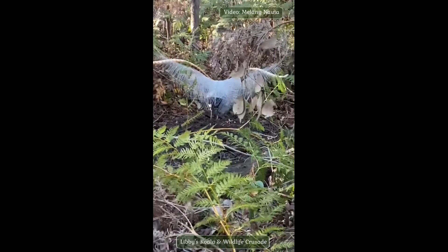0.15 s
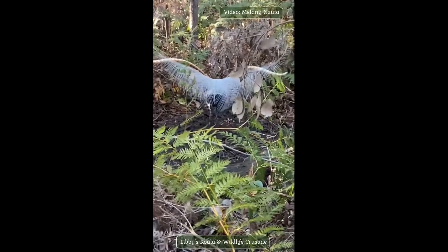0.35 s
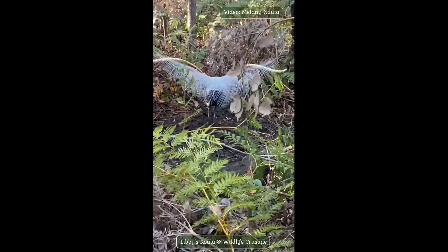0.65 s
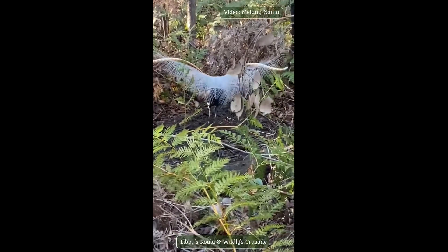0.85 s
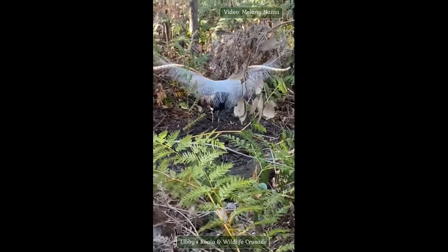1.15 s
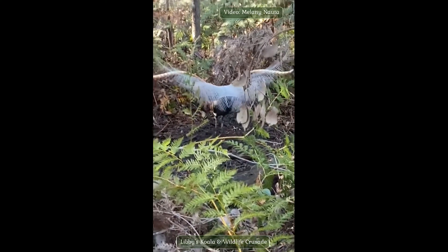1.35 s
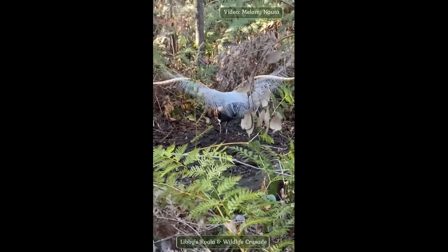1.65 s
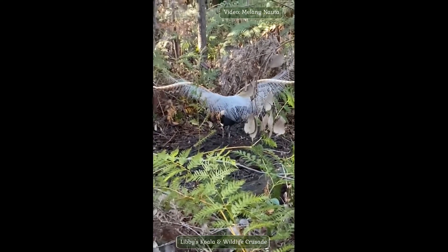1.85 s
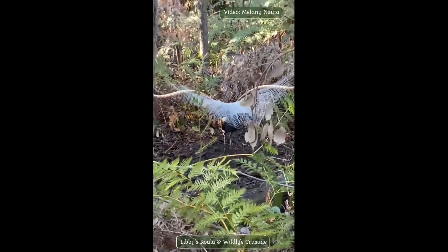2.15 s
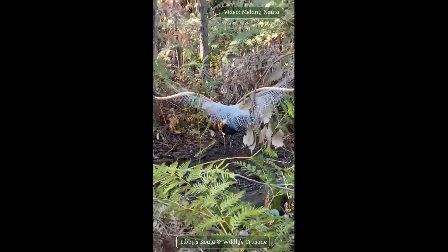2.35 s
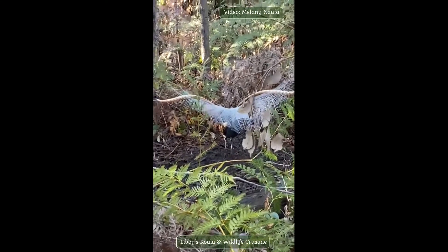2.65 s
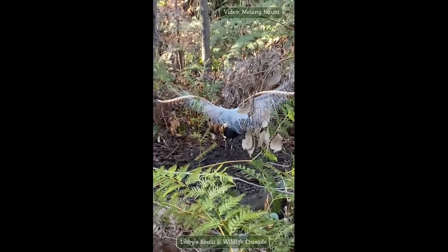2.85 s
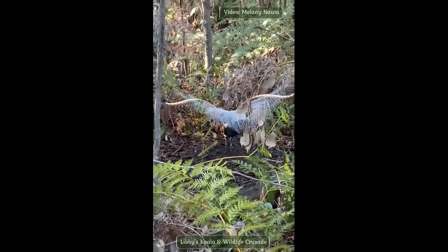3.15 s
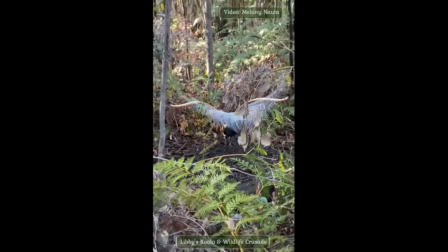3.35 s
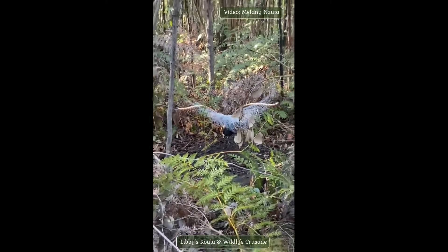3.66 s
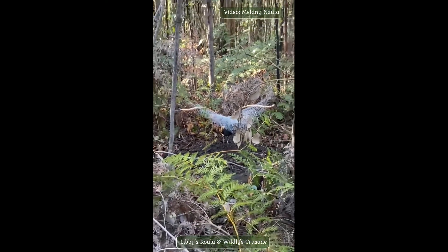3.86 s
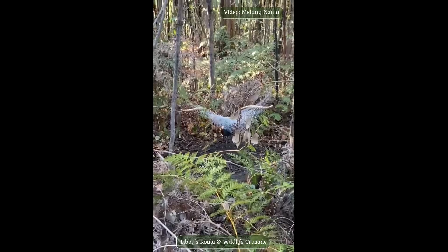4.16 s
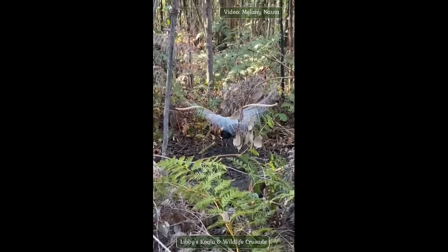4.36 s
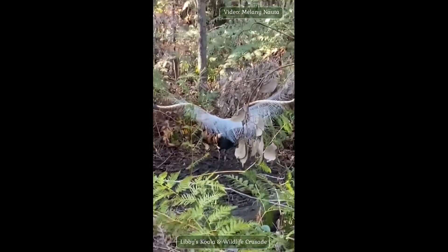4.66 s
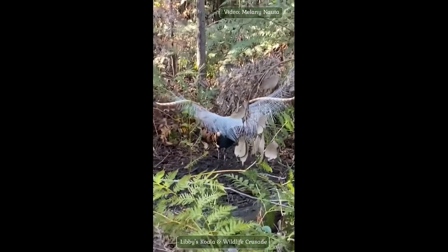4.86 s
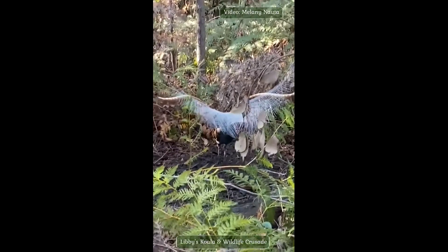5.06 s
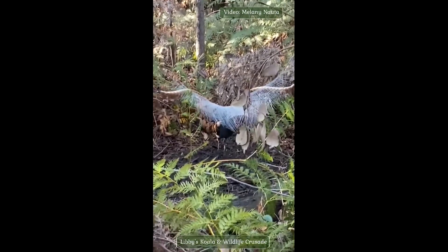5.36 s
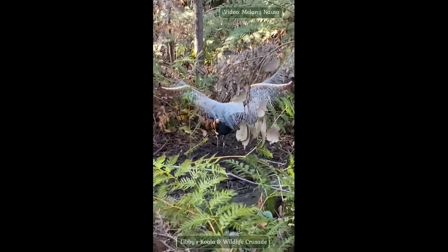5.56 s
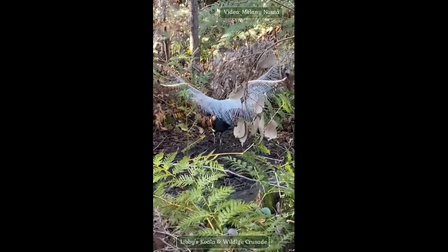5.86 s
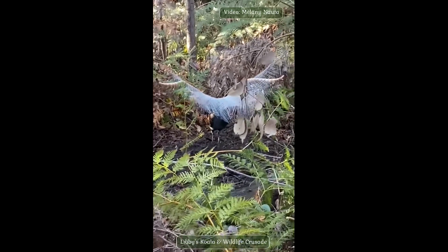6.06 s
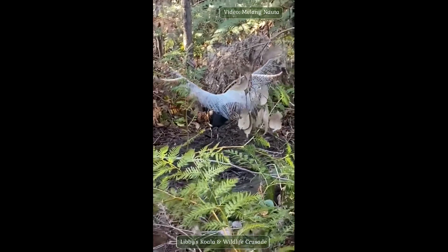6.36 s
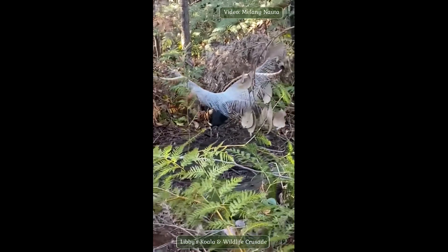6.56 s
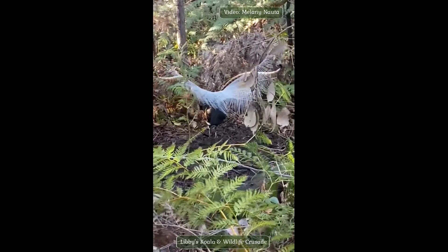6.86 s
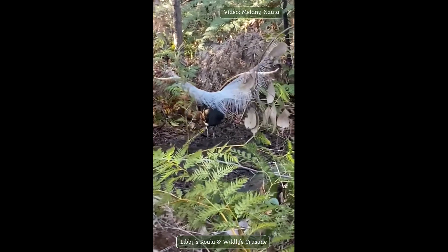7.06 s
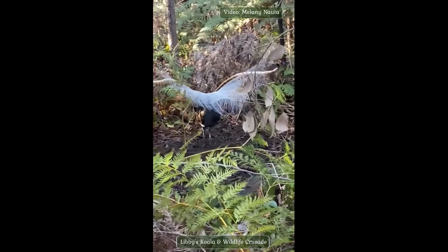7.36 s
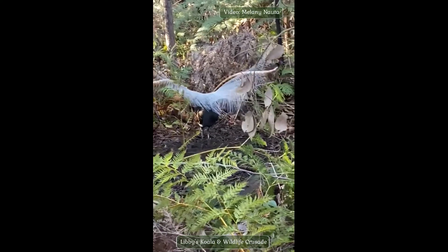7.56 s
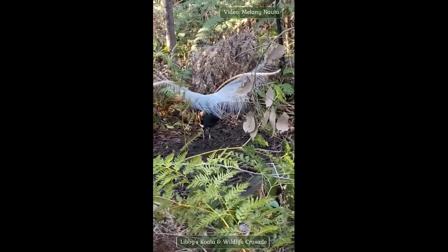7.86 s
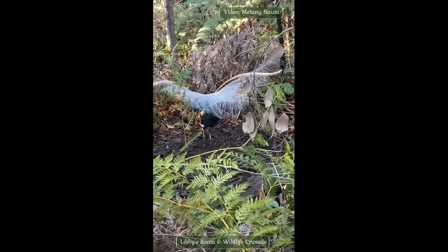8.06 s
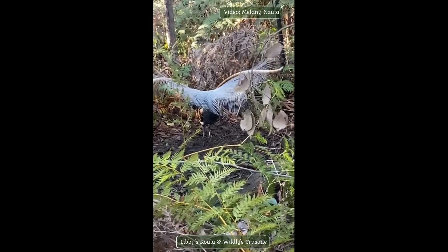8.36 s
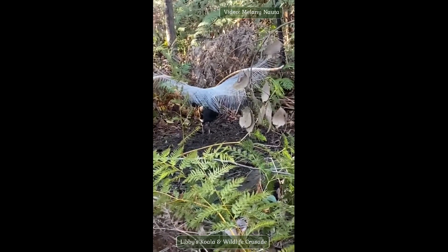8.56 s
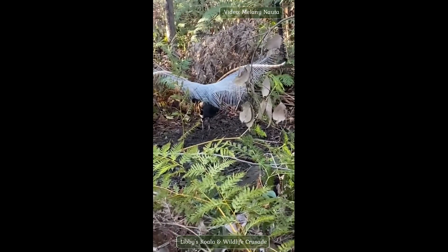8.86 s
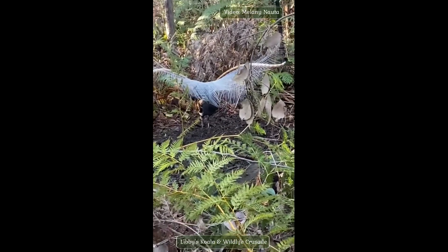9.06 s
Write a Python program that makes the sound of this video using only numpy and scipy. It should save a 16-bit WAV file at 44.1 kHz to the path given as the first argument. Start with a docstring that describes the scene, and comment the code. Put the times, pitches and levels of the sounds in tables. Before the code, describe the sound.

Sharp downward whistles from a displaying lyrebird ring through still woodland, framed by raspy squawks, a few wooden clacks and a late chirping burst.

```python
"""A male lyrebird on a quiet forest floor, a few metres away: falling whip-like whistles, reedy squawks, dry clacks.
Whistles and squawks are gliding partials with rasp; clacks, purr and chucks are noise through resonances.
Ground and trunks scatter every note into a long soft tail, by convolution with echoes and decaying noise.
Swells of noise make feathers and litter rustle; shaped noise gives a low distant rumble and still air, a sine a far hum."""
import sys
import numpy as np
from scipy import signal
from scipy.fft import rfft, irfft, next_fast_len
from scipy.io import wavfile
from scipy.ndimage import uniform_filter1d, map_coordinates

SR = 44100
rng = np.random.default_rng(int(sys.argv[2]) if len(sys.argv) > 2 else 0)


def file_out(sig):
    """Save sig as 16-bit WAV at sys.argv[1]."""
    # one column per channel
    cols = np.atleast_2d(sig).T
    # limit, then scale
    lim = np.clip(cols, -1, 1)
    pcm = np.round(lim * 32767).astype(np.int16)
    wavfile.write(sys.argv[1], SR, pcm)


N = 406161
TIME = np.arange(N) / SR

# how the throat passes weak upper partials: freq_hz, gain_db
THROAT_GAIN = [(2000, -31.5), (3200, -34), (5000, -37.5), (6200, -46.5), (7500, -45.5), (9500, -30),
               (11500, -35.5), (14000, -51.5)]
# colour of the rasp in the voice: freq_hz, density_db (per Hz, relative)
RASP_SPECTRUM = [(800, -21), (1500, -2), (3000, 0), (5000, 0.5), (7300, -11.5), (10000, -11),
                 (12500, -10.5)]


def from_db(db):
    """Decibels to amplitude ratio."""
    return 10 ** (np.asarray(db) / 20)


def rms_one(x):
    """Scale to unit power."""
    return x / np.sqrt(np.mean(x ** 2) + 1e-20)


def in_time(rows, t=TIME):
    """Each column of a curve, read at times t."""
    time_s, *columns = np.transpose(rows)
    return [np.interp(t, time_s, column) for column in columns]


def at_hz(points, hz, axis=1):
    """A spectrum column read on a log-frequency axis."""
    points = np.array(points)
    return np.interp(np.log(hz + 1), np.log(points[:, 0]), points[:, axis])


def coloured(spectrum, size=N):
    """Noise with the given spectrum, falling steeply beyond its ends; rms 1."""
    padded = next_fast_len(size)
    hz = np.arange(padded // 2 + 1) * SR / padded
    low_end = 1 + (spectrum[0][0] / (hz + 1)) ** 6
    high_end = 1 + (hz / spectrum[-1][0]) ** 16
    gain = from_db(at_hz(spectrum, hz)) / low_end / high_end
    white = rng.standard_normal(padded)
    return rms_one(irfft(rfft(white) * gain, padded)[:size])


def wander(t, rate_hz):
    """Smooth chance of spread about 1: random knots, rate_hz a second, joined by a cubic spline."""
    steps = (t - t[0]) * rate_hz
    knots = rng.standard_normal(int(steps[-1]) + 2)
    return map_coordinates(knots, [steps], order=3, mode="nearest")


def resonate(x, modes):
    """Parallel two-pole resonances (freq_hz, width_hz, gain_db) with alternating signs."""
    out = 0
    for k, (hz, width_hz, gain_db) in enumerate(modes):
        radius = np.exp(-np.pi * width_hz / SR)
        poles = [1, -2 * radius * np.cos(2 * np.pi * hz / SR), radius ** 2]
        gain = (-1) ** k * from_db(gain_db) * (1 - radius ** 2) / 2
        out = out + gain * signal.lfilter([1, 0, -1], poles, x + 1e-18)
    return out


def add(track, start_s, sound):
    """Mix a short sound into a track."""
    i = max(int(start_s * SR), 0)
    track[i:i + len(sound)] += sound[:N - i]


def syrinx(note, jitter, shimmer_db, trill=(0, 0, 0), edge_s=.005):
    """Unsteady membrane vibration: times, pitch, phase, amplitude; a trill arches pitch and level together."""
    t = np.arange(note[0][0] - edge_s / 2, note[-1][0] + edge_s, 1 / SR)
    hz, db = in_time(note, t)[:2]
    trill_hz, pitch_share, trill_db = trill
    arches = 2 * np.abs(np.sin(np.pi * trill_hz * (t - note[0][0]))) - 4 / np.pi   # zero mean
    hz = uniform_filter1d(hz * (1 + pitch_share * arches), size=88)   # 2 ms
    hz = hz * (1 + jitter * wander(t, 500))
    phase = 2 * np.pi * np.cumsum(hz) / SR

    to_edge_s = np.minimum(t - t[0], t[-1] - t)
    gate = np.sin(np.pi / 2 * np.clip(to_edge_s / edge_s, 0, 1)) ** 2
    level_db = db + trill_db * arches + shimmer_db * wander(t, 200)
    height = uniform_filter1d(from_db(level_db), size=88)
    return t, hz, phase, np.sqrt(2) * gate * height


def whip(start_s, length_s, hold_s, top_hz, end_hz, stairs, peak_db, peak_s, swell_db, fade_db,
         sag_oct_per_s=1, stair_s=.021, fall_bend=.36, swell_power=1.3, fade_power=2.1):
    """Whip gesture as (time_s, pitch_hz, level_db): sagging hold, any stairs, easing plunge; swell and fade."""
    t = np.arange(0, length_s, 1 / 2000)
    falling_s = np.maximum(t - hold_s, 0)
    stair = np.floor(falling_s / stair_s)
    on_stair = (t > hold_s) & (stair < round(stairs))
    falling_s = np.where(on_stair, (stair + .5) * stair_s, falling_s)
    along = falling_s / (length_s - hold_s)
    bent = along + fall_bend * along * (1 - along)   # starts fast; a bend of 0 is an even glide
    held_hz = top_hz * 2 ** (-sag_oct_per_s * np.minimum(t, hold_s))
    hz = held_hz * (end_hz / held_hz) ** bent

    before = np.clip(1 - t / peak_s, 0, 1)
    after = np.clip((t - peak_s) / (length_s - peak_s), 0, 1)
    db = peak_db - swell_db * before ** swell_power - fade_db * after ** fade_power
    return np.column_stack([start_s + t, hz, db])


def whistles(rasp_db=-46, partial_step_db=-2.0, flutter_db=3.5, whip_grain_rad=1):
    """Gliding sines; faint grainy upper partials swell as they cross the throat's resonances."""
    # held pitch, then plunge: start_s, length_s, hold_s, top_hz, end_hz, stairs (count), peak_db,
    # peak_s (from start), swell_db, fade_db, upper_db (rasp and upper partials)
    whip_notes = [(3.615, 0.076, 0.03344, 1302, 1040, 0, -23, 0.021, 24, 18.5, -3),
                  (3.714, 0.073, 0.0034, 2675, 1022, 0, -11.5, 0.012, 12, 31, 1),
                  (3.997, 0.12, 0.015, 3127, 1254, 2, -14.5, 0.059, 4.5, 22.5, 3),
                  (4.15, 0.1, 0.025, 2543, 1289, 1, -16, 0.043, 7, 21, 1),
                  (4.282, 0.09, 0.019, 2656, 1359, 1, -18.5, 0.042, 3.5, 17, -1.5),
                  (4.531, 0.123, 0.057, 2492, 1043, 0, -14.5, 0.073, 11.5, 21, 1),
                  (4.806, 0.096, 0.025, 2350, 1051, 0, -14.5, 0.055, 13, 24.5, 1),
                  (4.935, 0.092, 0.02, 2720, 1330, 1, -18, 0.069, 13.5, 13.5, 0.5),
                  (5.048, 0.074, 0.014, 2580, 988, 0, -13, 0.023, 12, 29.5, 1),
                  (5.278, 0.11, 0.021, 2380, 979.7, 0, -14.5, 0.048, 19, 25.5, -0.5),
                  (5.456, 0.052, 0.009, 1825, 1177, 0, -21.5, 0.019, 10.5, 19.5, -4),
                  (5.523, 0.072, 0.014, 2562, 1089, 0, -12, 0.023, 15.5, 25.5, 2),
                  (5.784, 0.104, 0.016, 2353, 974, 0, -14, 0.042, 18, 24, -2.5),
                  (5.981, 0.11, 0.023, 2339, 1068, 0, -13, 0.052, 17.5, 21.5, -1.5),
                  (6.154, 0.051, 0.01, 1823, 1170, 0, -26, 0.02, 8, 14, -6.5),
                  (6.22, 0.071, 0.015, 2559, 1087, 0, -12.5, 0.022, 20.5, 25.5, 3),
                  (6.487, 0.07, 0.006, 1940, 1054, 0, -24, 0.028, 10.5, 26.5, -8),
                  (6.689, 0.059, 0.011, 2530, 1236, 0, -31, 0.025, 7.5, 18.5, -2)]
    # scoop, two long slurs, warbled arch, high trembling fall; a curve a note: time_s, pitch_hz, level_db
    slur_notes = [
        [(1.94, 2910, -41), (1.95, 2730, -26), (1.969, 2430, -20), (1.98, 2670, -22.5), (1.987, 3560, -41)],
        [(1.996, 3560, -35.5), (2.001, 3410, -25.5), (2.017, 2950, -12.5), (2.036, 2480, -19),
         (2.073, 2290, -16), (2.1, 2090, -14.5), (2.133, 1750, -24.5), (2.15, 900, -47), (2.168, 440, -49)],
        [(2.201, 3560, -46.5), (2.207, 2900, -20), (2.22, 2890, -19), (2.226, 2490, -23), (2.273, 2060, -13.5),
         (2.297, 1820, -24.5), (2.314, 1510, -28), (2.338, 700, -73.5)],
        [(2.838, 1720, -50.5), (2.859, 1980, -20.5), (2.885, 2190, -15.5), (2.932, 2016, -14.5),
         (2.966, 1830, -19.5), (2.998, 1310, -31), (3.01, 990, -53.5)],
        [(3.282, 3660, -38), (3.296, 3570, -25.5), (3.339, 3187, -13), (3.375, 2660, -16.5),
         (3.405, 2472, -22.5), (3.416, 2410, -36)],
    ]
    # a row a slur: upper_db, grain_rad (unsteady upper partials), trill_hz, trill_pitch_share, trill_db
    slur_tone = [(5, .3, 60, .005, .5), (1.5, .2, 95, .018, 2), (-1, .25, 90, .005, .5),
                 (3, .15, 68, .063, 2), (1.5, .25, 72, .026, 1.2)]
    notes = list(zip(slur_notes, slur_tone))
    for *gesture, upper_db in whip_notes:
        notes.append((whip(*gesture), (upper_db, whip_grain_rad, 0, 0, 0)))

    out = np.zeros(N)
    for note, (upper_db, grain_rad, *trill) in notes:
        t, hz, phase, height = syrinx(note, jitter=.005, shimmer_db=2.31, trill=trill)
        upper = from_db(rasp_db) * coloured(RASP_SPECTRUM, size=len(t))
        for k in range(2, 10):
            partial_db = at_hz(THROAT_GAIN, k * hz) + partial_step_db * (k - 2)
            partial_db = partial_db + flutter_db * wander(t, 120)
            grain = grain_rad * np.sqrt(k - 1) * wander(t, 300)   # high partials are less steady
            audible = k * hz < SR / 2
            upper += from_db(partial_db) * np.sin(k * phase + grain) * audible
        add(out, t[0], height * (np.sin(phase) + from_db(upper_db) * upper))
    return out


def squawks(top_db=1.5, top_step_db=-1.0, rasp_throb_db=4.0):
    """The membranes clap shut: strong low partials, and rasp that pulses with each cycle."""
    # reedy calls, a curve a note: time_s, pitch_hz, level_db, octave_db (octave partial over fundamental)
    notes = [
        [(0.82, 2033, -47, -11.5), (0.845, 2081, -43.5, -13), (0.885, 2144, -39, -9.5),
         (0.95, 2427, -31.5, -4.5), (1.012, 2608, -25, -7.5), (1.025, 2462, -38, -10)],
        [(1.276, 1486, -47.5, -1.5), (1.315, 1573, -44, 3), (1.361, 1566, -37, 0.5), (1.38, 1341, -42, 1)],
        [(1.35, 1605, -40, -8), (1.365, 1543, -38, 2), (1.378, 1285, -38, 4.5), (1.41, 1003, -42, 5),
         (1.48, 835, -42, -13), (1.503, 767, -50, -12)],
        [(1.583, 3800, -24, -22), (1.587, 4550, -20, -15.5), (1.598, 4664, -23.5, -20), (1.604, 4483, -28, -15)],
        [(2.51, 2119, -29, -26), (2.513, 2180, -30.5, -34), (2.522, 2423, -19.5, -16.5),
         (2.535, 3925, -15, -12.5), (2.54, 4750, -17.5, -17.5), (2.55, 4743, -27, -27.5)],
        [(3.033, 4184, -52, -31), (3.038, 3467, -24, -35), (3.042, 2899, -17.5, -31), (3.051, 1988, -24, -4.5),
         (3.072, 1216, -35, 2.5), (3.085, 812, -56, 3), (3.1, 520, -61, -12)],
        [(8.828, 1560, -43, -22), (8.833, 1468, -32.5, -12), (8.844, 1428, -27, -12), (8.857, 1560, -35, -11.5),
         (8.87, 1390, -54, -25)],
        [(8.874, 2217, -18.5, -15), (8.878, 2410, -14.5, -11), (8.891, 2512, -16, -6.5),
         (8.895, 2660, -26, -2.5), (8.901, 2290, -55, -12)],
        [(8.903, 1950, -24, -21), (8.911, 2180, -20, -29), (8.92, 2030, -26, -27), (8.925, 1680, -29.5, -30),
         (8.942, 1310, -32, -28), (8.965, 1005, -45, -5), (8.985, 622, -59, -6)],
    ]
    # a row a call: gain_db, third_db (third partial re octave partial), rasp_db, trill_hz,
    # trill_pitch_share, trill_db
    tones = [(1, -18.5, -54, 0, 0.0044, 0), (0, -6, -15.5, 38, 0.0645, 6.5), (0.5, -15.5, -10, 0, 0, 0),
             (-1, -38, -23, 159, 0.12, 5), (-0.5, -14.5, -21.5, 167.5, 0.07, 2),
             (-1, -7, -17.5, 0, 0.0017, -2.5), (0, -17, -26.5, 0, 0.0017, 0.5),
             (-2.5, -29, -28, 0, 0.0033, 1), (-1.5, -27, -30, 0, 0.0031, 1)]
    # other side of the syrinx, joins the first harsh squawk: time_s, pitch_hz, level_db
    second_voice = [(1.368, 2240, -44), (1.373, 2200, -27), (1.381, 2100, -27), (1.4, 1610, -28.5),
                    (1.427, 1502, -23), (1.435, 1370, -26.5), (1.451, 1350, -30.5), (1.484, 1217, -33.5),
                    (1.495, 1110, -43.5)]

    out = np.zeros(N)
    for note, (gain_db, third_db, rasp_db, *trill) in zip(notes, tones):
        jitter = 0.0029 + 0.028 * from_db(rasp_db)
        t, hz, phase, height = syrinx(note, jitter=jitter, shimmer_db=1.93, trill=trill)
        octave_db = in_time(note, t)[2]
        overtones = np.sin(2 * phase) + from_db(third_db) * np.sin(3 * phase)
        tone = np.sin(phase) + from_db(octave_db) * overtones
        for k in range(4, 8):
            partial_db = at_hz(THROAT_GAIN, k * hz) + top_db + top_step_db * (k - 4)
            tone += from_db(partial_db) * np.sin(k * phase) * (k * hz < SR / 2)
        pulse = (1 + np.sin(phase)) / 2
        rasp_gain = from_db(rasp_db + rasp_throb_db * wander(t, 230))
        tone += rasp_gain * coloured(RASP_SPECTRUM, size=len(t)) * pulse
        add(out, t[0], from_db(gain_db) * height * tone)

    t, hz, phase, height = syrinx(second_voice, jitter=0.02, shimmer_db=1.5)
    rasp = from_db(-42.5) * coloured(RASP_SPECTRUM, size=len(t))
    add(out, t[0], height * (np.sin(phase) + rasp))
    return out


def clacks(fall_s=0.0055, rise_s=0.0005, crack_db=-9, trim_db=-6.0, lead_s=0.003,
           from_hz=1150, to_hz=430, slide_s=0.0125, husk_db=-5, gape_spread=0.02):
    """An abrupt burst of turbulence rings the throat and bill, amid a soft husky downward slide."""
    # start_s, level_db (before trim_db), length_s, slide_db (soft falling tone)
    strokes = [(7.5407, -24, 0.016, -45), (7.6166, -21.5, 0.014, -57), (7.7173, -28.5, 0.012, -56),
               (7.829, -30.5, 0.0071, -53), (8.026, -36.5, 0.0078, -55)]
    # resonances before gape scaling: freq_hz, width_hz, gain_db
    modes = [(972, 930, -9), (1576, 67, 10.5), (2453, 167, -13), (3410, 208, 5.5), (4050, 230, -2),
             (5080, 150, -5), (5770, 250, -8.5), (10760, 860, -32)]

    out = np.zeros(N)
    t = np.arange(SR // 10) / SR
    for start_s, level_db, length_s, slide_db in strokes:
        decay = np.exp(-np.maximum(t - length_s / 2, 0) / fall_s)
        burst = rng.standard_normal(len(t)) * decay * (1 - np.exp(-t / rise_s))
        gape = 1 + gape_spread * np.clip(rng.standard_normal(), -2, 2)   # bill opening varies
        gaped = [(hz * gape, width_hz, gain_db) for hz, width_hz, gain_db in modes]
        ring = rms_one(resonate(burst, gaped))
        dry_crack = rms_one(resonate(burst, [(1930, 1460, 0)]))
        crack = from_db(crack_db) * strokes[0][2] / length_s   # shorter clacks are drier, ring less
        clack = (ring + crack * dry_crack) / np.hypot(1, crack)
        add(out, start_s, from_db(level_db + trim_db) * np.sqrt(length_s / t[-1]) * clack)

        along = np.minimum(t / slide_s, 1)
        slide_hz = from_hz * (to_hz / from_hz) ** along
        slide = np.sin(2 * np.pi * np.cumsum(slide_hz) / SR)
        slide = slide + from_db(husk_db) * coloured(RASP_SPECTRUM, size=len(t))
        add(out, start_s - lead_s, from_db(slide_db) * np.sin(np.pi * along) * slide)
    return out


def murmurs(throb_db=1.0):
    """Quiet husky purr and short low chucks between the loud calls: noise through resonances."""
    # purr level: time_s, level_db
    purr_level = [(1.44, -62.5), (1.50, -46), (1.60, -53), (1.72, -49.5), (1.84, -50.5), (1.87, -51),
                  (1.93, -65.5)]
    # purr resonances: freq_hz, width_hz, gain_db
    purr_modes = [(500, 140, -6.5), (985, 37, -5.5), (1397, 59, 1), (2322, 190, -11.5), (3650, 1400, -26),
                  (9900, 300, -22)]
    # peak_s, level_db, sigma_s (Gaussian swell), centre_hz
    chucks = [(0.397, -47, 0.0024, 1120), (0.414, -49.5, 0.0064, 1060), (0.54, -50, 0.0035, 1180),
              (1.902, -41, 0.017, 524), (1.912, -40.5, 0.0059, 990), (2.57, -49, .011, 500)]

    purr = rms_one(resonate(rng.standard_normal(N), purr_modes))
    out = from_db(in_time(purr_level)[0] + throb_db * wander(TIME, 140)) * purr
    out *= (TIME > purr_level[0][0]) & (TIME < purr_level[-1][0])
    t = np.arange(-SR // 20, SR // 20) / SR
    for peak_s, level_db, sigma_s, centre_hz in chucks:
        noise = coloured([(350, 0.012), (1700, 0.012)], size=len(t))
        husk = rms_one(resonate(noise, [(centre_hz, 700, 0)]))
        add(out, peak_s + t[0], from_db(level_db) * np.exp(-.5 * (t / sigma_s) ** 2) * husk)
    return out


def swishes(grain_db=0.5):
    """Feathers and dry leaves brush past each other in grainy swells of noise."""
    # peak_s, level_db, sigma_s (Gaussian swell)
    strokes = [(0.0, -49.5, 0.023), (0.067, -36, 0.012), (0.291, -64.5, 0.014), (0.404, -62.5, 0.018),
               (0.536, -59.5, 0.0034), (0.672, -61.5, 0.013)]
    # freq_hz, density_db (per Hz, relative)
    spectrum = [(300, -13), (550, 3), (1200, 9.5), (1700, 3), (3600, 1), (5700, -17), (7500, -35),
                (9700, -10), (12000, -39)]
    swell = np.zeros(N)
    for peak_s, level_db, sigma_s in strokes:
        squared = np.minimum(((TIME - peak_s) / sigma_s) ** 2, 100)
        swell += from_db(level_db) * np.exp(-.5 * squared)
    return swell * from_db(grain_db * wander(TIME, 500)) * coloured(spectrum)


def echoes(t, per_s, fade_s):
    """Sparse random-sign reflections after 1 ms, two channels, unit energy each."""
    shape = (2, len(t))
    hits = rng.random(shape) < per_s / SR
    taps = rng.choice([-1, 1], shape) * hits * np.exp(-t / fade_s) * (t > .001)
    return taps / np.sqrt(np.sum(taps ** 2, axis=1, keepdims=True) + 1e-12)


def diffuse_tail(t, build_s):
    """Far trunks return a long tail: bands of noise, each with its own decay."""
    # freq_hz, level_db (relative), t60_s
    decay = [(300, -3, .6), (1000, 0.5, 1), (2000, -6.5, 1), (3220, -4.5, 0.77), (5000, 15, 0.19),
             (8000, 5, 0.17), (12000, -3.5, 0.29)]
    edges_hz = np.geomspace(200, 14000, 11)
    tail = 0
    for low_hz, high_hz in zip(edges_hz, edges_hz[1:]):
        hz = np.sqrt(low_hz * high_hz)
        bandpass = signal.butter(2, [low_hz, high_hz], "band", fs=SR, output="sos")
        band = signal.sosfilt(bandpass, rng.standard_normal((2, len(t))))
        fade = np.exp(-np.log(1000) * t / at_hz(decay, hz, axis=2))
        tail = tail + band * from_db(at_hz(decay, hz)) * fade
    return tail * (1 - np.exp(-t / build_s)) * np.sqrt(2 * np.log(1000) / SR)


def forest(x, ground_db=-15, ground_s=0.025, near_db=-21, near_s=0.073,
           treble_db=-3, treble_hz=5500, treble_s=0.0062, tail_db=-21, build_s=0.0035, apart=0.34):
    """Ferns and ground scatter quick echoes, most of all in the treble; the trunks' tail dulls as it dies."""
    t = np.arange(SR * 3 // 2) / SR
    highpass = signal.butter(4, treble_hz, "high", fs=SR, output="sos")
    leaves = from_db(treble_db) * signal.sosfilt(highpass, echoes(t, 900, treble_s))
    ground = from_db(ground_db) * echoes(t, 900, ground_s)   # beats against each glide and ripples it
    near = from_db(near_db) * echoes(t, 2000, near_s)
    tail = from_db(tail_db) * diffuse_tail(t, build_s)
    mid, side = ground + near + leaves + tail
    response = np.array([mid + apart * side, mid - apart * side])
    return x + signal.fftconvolve(x[None], response, axes=1)[:, :N]


def ports(x):
    """Give each frequency its level and phase difference between the two microphone ports."""
    # freq_hz, left_minus_right_db, left_lead_rad
    differences = [(250, 1, .01), (549.6, 2, 0.17), (920, 4.5, 0.15), (1350, 6, .1), (1570, 3.5, 0.2),
                   (2220, 0.5, 0.11), (3344, 0.15, 0.094), (5830, 0, 0.23), (6700, 0.5, 3.4),
                   (8160, -0.35, 3.5), (9830, 0.7, 5.6), (10200, -0.5, 5.5), (11400, -0.66, 7.3)]
    size = next_fast_len(N + SR // 10)
    hz = np.arange(size // 2 + 1) * SR / size
    lead_rad = at_hz(differences, hz, axis=2)
    half = from_db(at_hz(differences, hz) / 2) * np.exp(1j * lead_rad / 2)
    return irfft(rfft(x, size) * np.array([half, 1 / half]), size)[:, :N]


def distant_rumble(rumble_db=2.0, heave_db=1.5):
    """Low noise, alike in both ears, heaving slowly."""
    # freq_hz, density_db (per Hz, relative)
    spectrum = [(12, -56), (20, -17), (46, -5.5), (64, 5.5), (108, -6), (146, -10), (179, -16),
                (260, -22.5), (340, -51), (570, -120)]
    # time_s, level_db (before rumble_db)
    level = [(0, -56.5), (1.1, -61.5), (1.85, -56), (2.2, -68), (2.8, -59.5), (3.6, -63.5), (5.1, -66),
             (6.3, -70), (6.6, -64.5), (9.2, -63.5)]
    level_db = in_time(level)[0] + rumble_db + heave_db * wander(TIME, 7.3)
    return from_db(level_db) * coloured(spectrum)


def forest_air(air_side=.5):
    """Faint air in the leaves: a noise common to both ears and another of opposite sign in each."""
    # freq_hz, density_db (per Hz, relative)
    spectrum = [(150, -7), (230, -2), (500, -2.5), (1000, -7.5), (2000, -17), (4000, -27), (8000, -30.5),
                (12500, -37)]
    # time_s, level_db (common part)
    level = [(0, -69.5), (.7, -67.5), (1.8, -68.5), (2.3, -71), (4, -72.5), (6, -75), (7.2, -77),
             (8.3, -76.5), (9.2, -76)]
    side = air_side * coloured(spectrum) * np.array([[1], [-1]])
    return from_db(in_time(level)[0]) * (coloured(spectrum) + side)


def far_hum():
    """A sine that wanders in pitch and level."""
    # time_s, pitch_hz, level_db
    course = [(6.1, 142, -93), (6.45, 144.6, -70), (7.4, 145, -65), (7.9, 147.4, -78), (9.2, 152, -77.5)]
    hz, db = in_time(course)
    phase = 2 * np.pi * np.cumsum(hz + 2.0 * wander(TIME, 13.0)) / SR
    return from_db(db + 1.5 * wander(TIME, 4.1)) * np.sqrt(2) * np.sin(phase)


def scene(song_low_hz=520):
    """The bird in the forest; the song is high-passed, keeping low thumps out of its unsteady pitch."""
    highpass = signal.butter(4, song_low_hz, "high", fs=SR, output="sos")
    song = signal.sosfilt(highpass, whistles() + squawks())
    floor = song + clacks() + murmurs() + swishes()
    return ports(forest(floor)) + distant_rumble() + forest_air() + far_hum()


def record(dry, edge_hz=12100):
    """The top is cut steeply by an elliptic low-pass."""
    lowpass = signal.ellip(10, .2, 70, edge_hz, fs=SR, output="sos")   # ripple dB, stopband dB
    return signal.sosfilt(lowpass, dry)


dry = scene()
out = record(dry)
file_out(out)
```